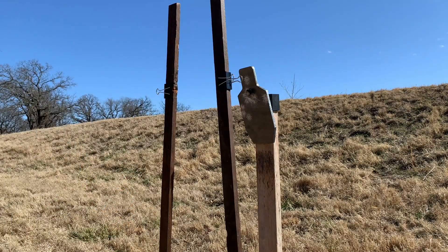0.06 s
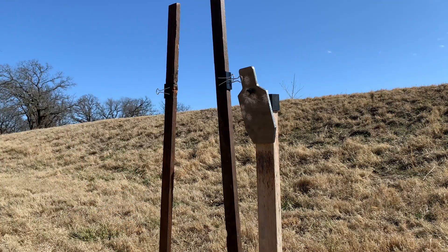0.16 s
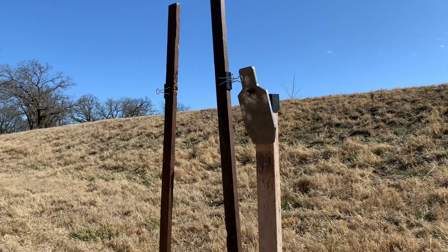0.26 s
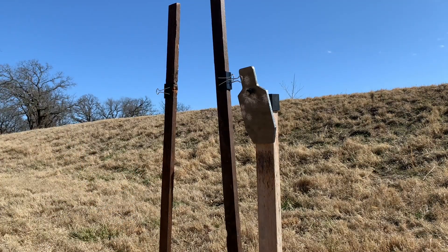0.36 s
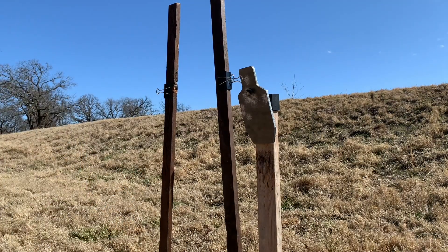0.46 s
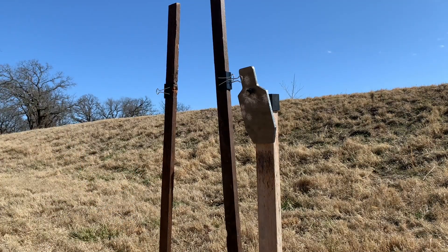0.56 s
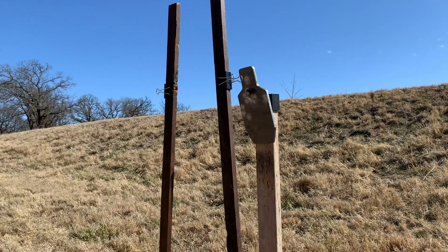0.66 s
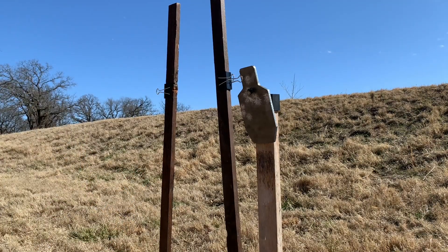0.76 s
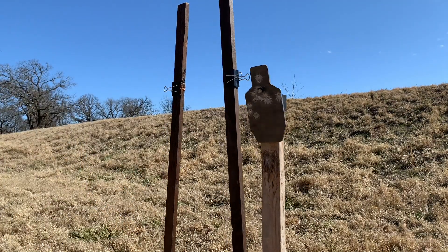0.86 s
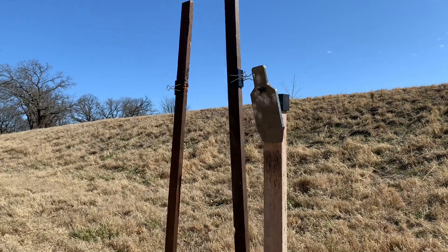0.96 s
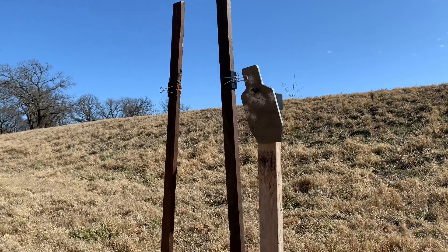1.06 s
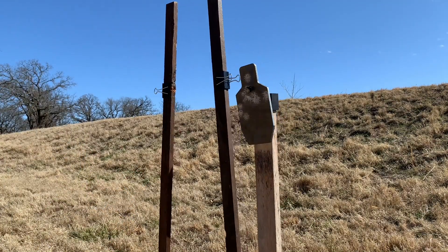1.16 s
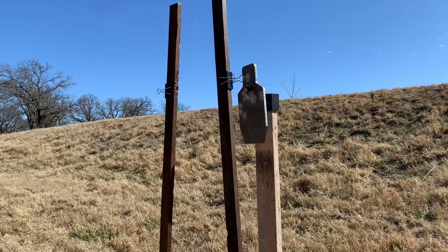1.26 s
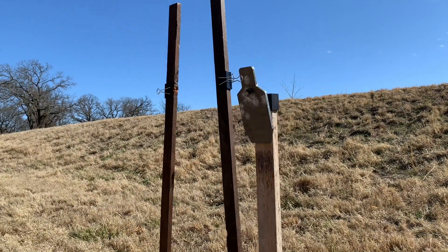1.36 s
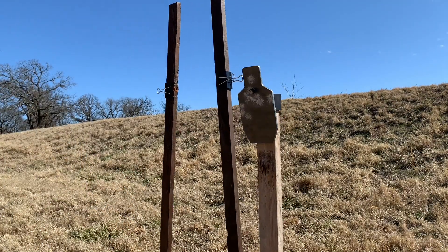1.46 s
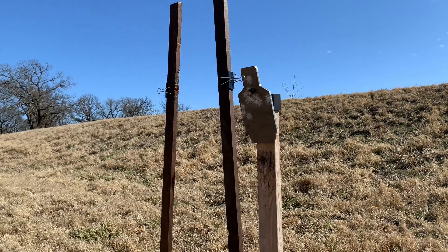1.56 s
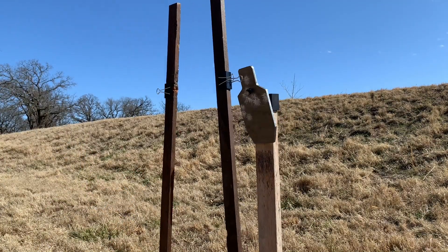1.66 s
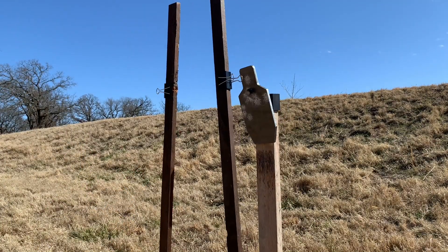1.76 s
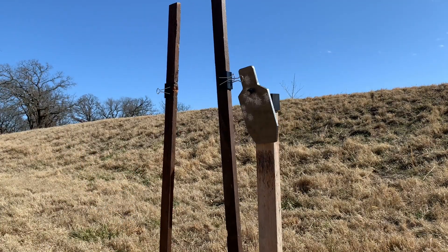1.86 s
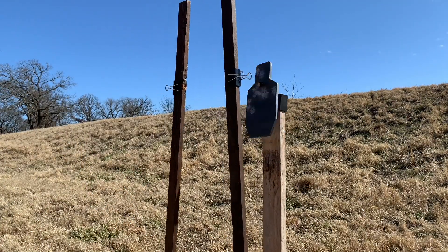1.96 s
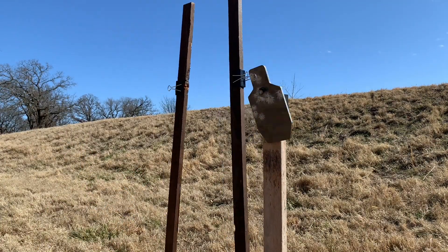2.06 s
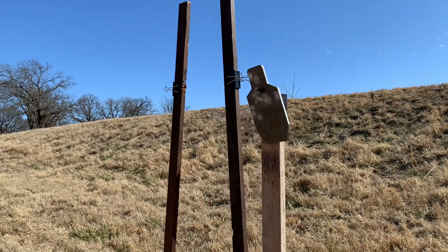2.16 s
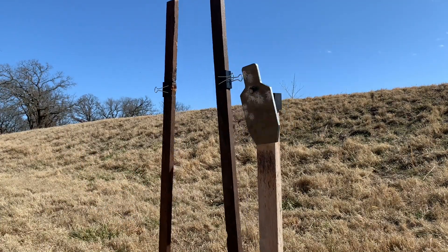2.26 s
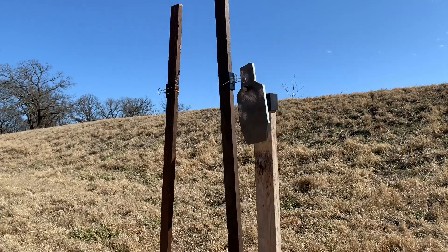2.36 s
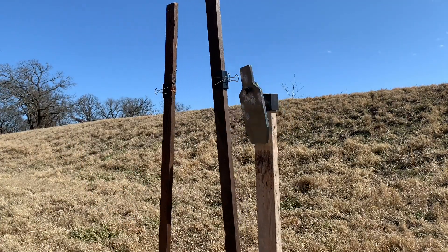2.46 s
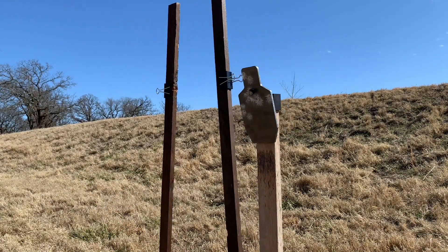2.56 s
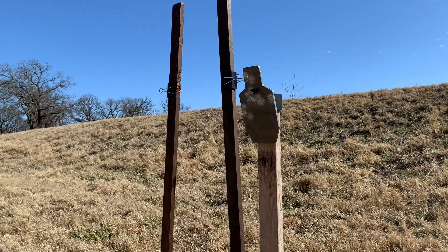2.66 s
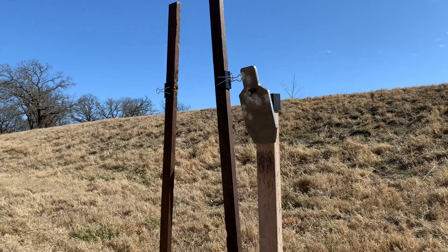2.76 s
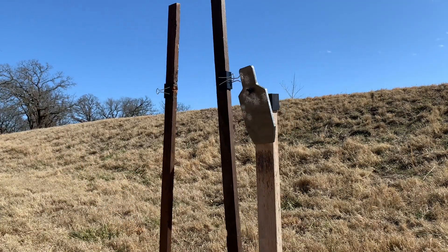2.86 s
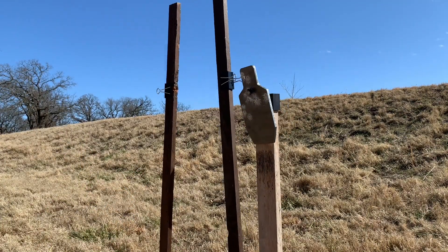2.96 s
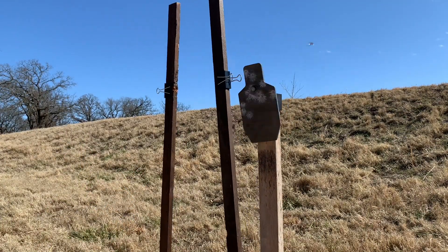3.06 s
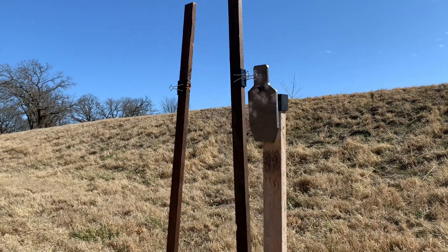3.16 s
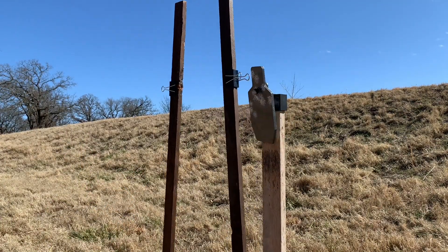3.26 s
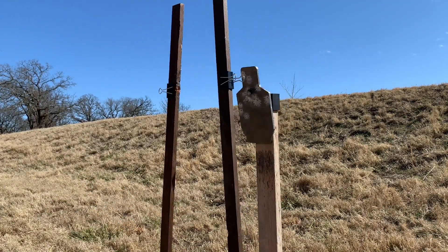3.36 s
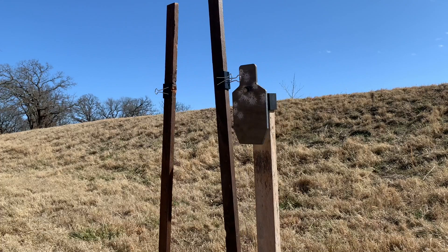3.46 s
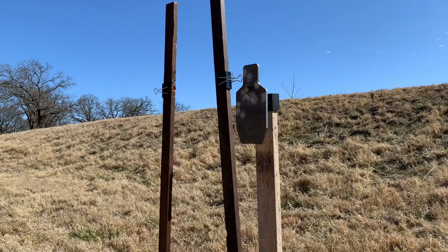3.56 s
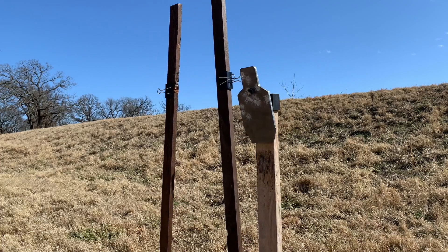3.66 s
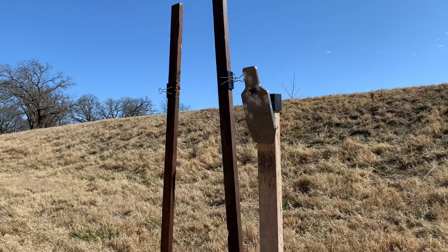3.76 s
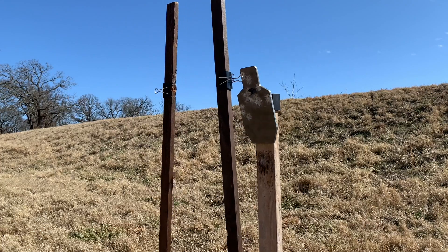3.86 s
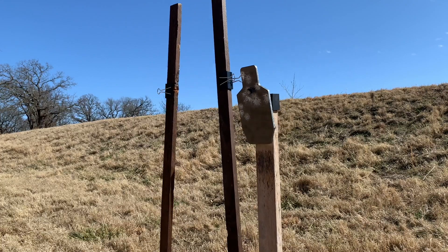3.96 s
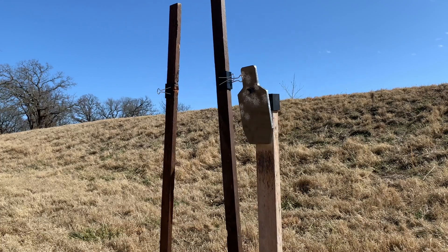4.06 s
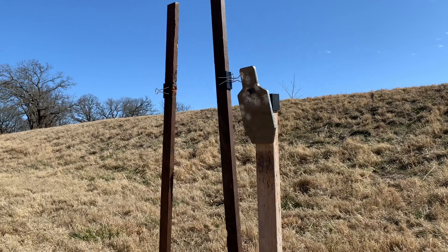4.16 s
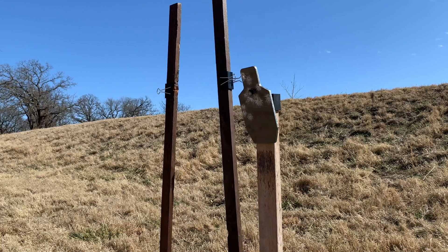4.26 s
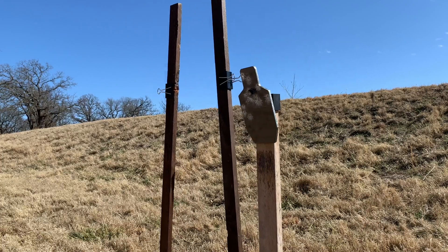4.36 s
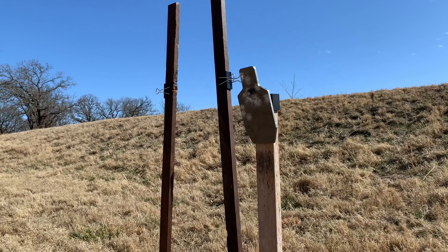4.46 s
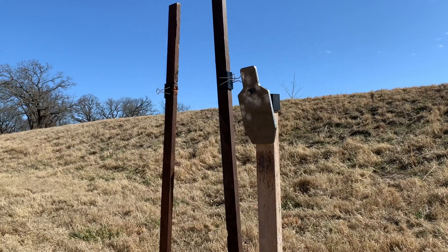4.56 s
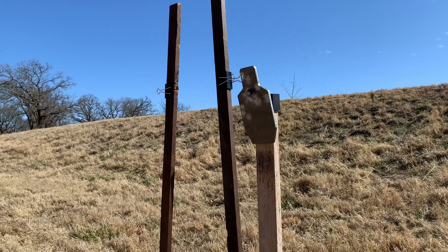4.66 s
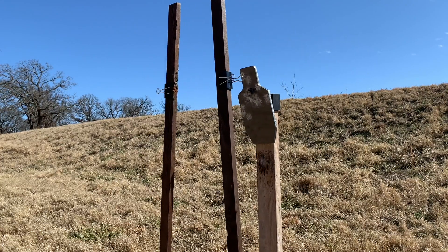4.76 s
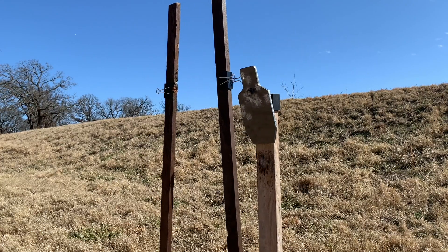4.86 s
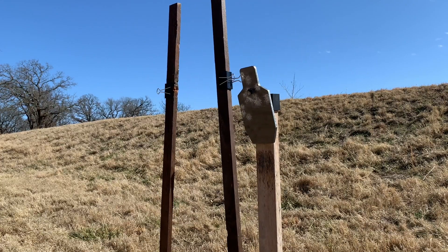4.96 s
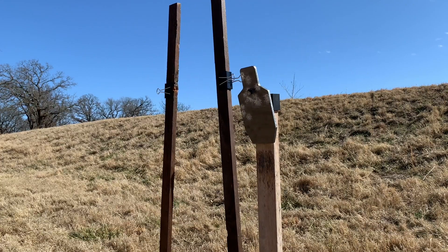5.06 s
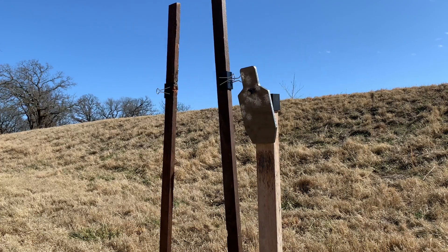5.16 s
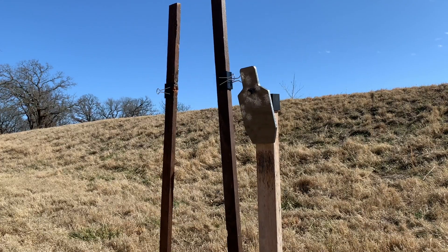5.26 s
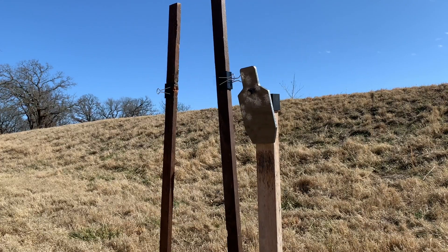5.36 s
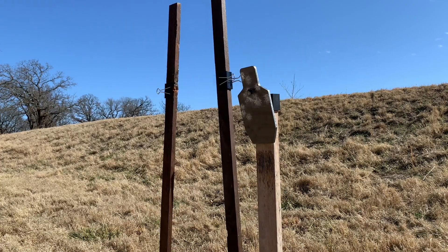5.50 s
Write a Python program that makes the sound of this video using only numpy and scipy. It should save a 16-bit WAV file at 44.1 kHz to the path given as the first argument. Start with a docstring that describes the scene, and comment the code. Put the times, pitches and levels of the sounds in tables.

```python
"""Wind buffets the microphone, then three pistol bullets strike a steel plate hung on a wooden post in an open field.
Each blast is a burst of coloured noise with a sharp crack, loud enough to overload the microphone; the post thumps.
The plate is a set of dying tones that swell and dip as it swings out and back, turning their lobes past the microphone.
Bands of noise make the roll, crackle and hiss after each shot, and the later slaps from far slopes.
The wind is low, lumpy noise over a faint rustle."""
import sys
import numpy as np
from scipy import signal
from scipy.io import wavfile
from scipy.ndimage import uniform_filter1d

SR = 44100
rng = np.random.default_rng(int(sys.argv[2]) if len(sys.argv) > 2 else 0)


def waveform_to_disk(signal):
    """Save audio, clipped to [-1, 1], as 16-bit WAV at the path in sys.argv[1]."""
    frames = np.transpose(np.atleast_2d(signal))
    scaled = np.clip(frames, -1, 1) * 32767
    samples = np.round(scaled).astype(np.int16)
    wavfile.write(sys.argv[1], SR, samples)


N = 243873  # length in samples, about 5.5 s

# The three shots. Each row: blast arrives in s, crack of the impact in s, ring breaks through in s.
SHOT_TIMES = [(.688, .7095, .716), (1.840, 1.8435, 1.851), (2.9955, 2.9958, 3.004)]
# Strength of each shot. Each row: rise time of the faint noise before the blast in s, blast level in dB,
# crack level in dB, thump level of the post in dB, pitch factor of the post.
SHOT_FORCE = [(0.0034, 6.5, 0.5, 0, 1.02), (0.0054, 4, -7.5, -7, 1.02), (0.0035, 7, -0.5, -1, .96)]
# Tone colour of the blast. Each row: frequency in Hz, relative level in dB per Hz.
BLAST_COLOUR = [(50, -24.5), (105, -7.5), (190, -13), (300, 0), (480, -9), (640, -2), (1000, -16),
                (2300, -22.5), (6000, -29), (12000, -72)]
# How alike left and right are in the blast. Each row: frequency in Hz, likeness from -1 to 1.
BLAST_LIKENESS = [(60, 0.68), (240, -0.39), (950, -0.71), (3770, -0.85), (15000, -0.99)]
# Tones of the wooden post: frequencies in Hz, before the pitch factor of the shot.
POST_TONES_HZ = (74, 108, 300, 372)
# For the same tones. Each row: level in dB on top of the thump level, time to fall by 60 dB in s.
POST_DECAY = [(-2.5, 0.19), (-2, 0.08), (-7, 0.11), (-9, 0.11)]


def blasts():
    """A churning pressure burst that lasts until the ring, with a sharp crack and the thump of the post."""
    churn = noise(BLAST_COLOUR, BLAST_LIKENESS, 1.3)
    snap = rng.standard_normal(N)
    out = np.zeros((2, N))
    t = np.arange(N) / SR
    for (start, crack, ring), (rise, blast_db, crack_db, post_db, pitch) in zip(SHOT_TIMES, SHOT_FORCE):
        # a faint noise rises just before the blast, which jumps to full level
        lead_in = np.exp(np.minimum(t - start, 0) / rise) * np.where(t < start, .3, 1)
        # steep drop just before the ring
        drop_db = 3100 * np.maximum(t - ring + 0.0027, 0)
        out += amp(blast_db - drop_db) * lead_in * churn
        out += fading(crack, crack_db, 12000) * snap
        thump = ring - .002
        for hz, (db, t60) in zip(POST_TONES_HZ, POST_DECAY):
            tone = np.sin(2 * np.pi * hz * pitch * (t - thump))
            out -= fading(thump, post_db + db, 60 / t60) * tone
    return out


# How the plate turns after each hit. Each row: turn when hit, bend of the kick (1 = even, 2 = slow to start),
# turn at the far point, starts back in s after the hit, at rest in s after the hit, turn at rest.
PLATE_SWING = [(0.17, 2.2, 1.076, 0.36, 0.476, .55), (0.065, 1.1, 0.904, 0.48, .62, 0.6),
               (-0.021, 0.99, 1.12, 0.23, 0.582, -0.25)]
KICK_S, KICKED_TURN = .16, .81  # the kick lasts this long and reaches this turn (about 0-1)
CREEPS_S, FAR_S = .24, 0.31  # after a hit: starts to creep on, reaches the far point


def swing(t, hit, bend, far, back_s, rest_s, rest):
    """Turn of the plate t seconds after a hit: kicked round, creeping to its far point, falling back ever faster."""
    kick = np.clip(t / KICK_S, 0, 1) ** bend
    creep = np.clip((t - CREEPS_S) / (FAR_S - CREEPS_S), 0, 1)
    fall = np.clip((t - back_s) / (rest_s - back_s), 0, 1) ** 2.33
    return hit + (KICKED_TURN - hit) * kick + (far - KICKED_TURN) * creep + (rest - far) * fall


# Ringing modes of the plate. Each row: frequency in Hz, time to fall by 60 dB in s,
# added loss in dB/s once the plate leans on its post, fill between the lobes (0-1),
# then for shots 1-3 each: lobe sweep in rad per unit of turn (3 columns),
# lobe angle facing the microphone in rad (3 columns), lead of the left side in rad (3 columns).
PLATE_MODES = [(625, 0.4, 0, 0.03, 4.9, 0.8, 0.6, 0.54, 1.4, 1.3, -0.0, -0.4, 0.9),
               (1050, 2.4, 54, 0.03, 0.4, 0.1, 0.5, 1.33, 1.49, 1.3, -0.4, -0.2, -0.1),
               (2070, 1.76, 5, 0.68, 2.3, 5.9, 5.6, 1.03, 0.41, 0.48, -0.4, -0.4, -0.2),
               (3104, 0.77, 0, 0.16, 1.9, 5.4, 1.1, 1.44, 0.45, 1.21, -2.2, -0.2, -1.1),
               (3987, 0.81, 51, 0.05, 2.3, 5.4, 3.3, -0.41, 0.64, -0.72, 0.6, 0.0, 0.5),
               (4815, 0.64, 400, 0.4, 3.9, 9.4, 4.8, 0.86, -0.01, 0.78, -0.9, 0.7, 1.0),
               (6415, 0.36, 182, 0.08, 4.8, 1.0, 5.7, 0.42, 1.27, 0.72, -0.6, -0.7, -0.7),
               (6960, 0.62, 301, 0.03, 5.1, 2.8, 1.3, 0.28, 1.57, 1.43, -0.7, -0.6, -1.4),
               (7158, 0.85, 179, 0.07, 5.1, 5.2, 5.4, 0.36, -0.27, 1.2, -1.1, -1.3, -1.2),
               (7980, 0.7, 400, 0.07, 5.3, 5.8, 7.5, 0.2, -0.36, 0.64, -2.4, -2.5, -2.3),
               (9105, 1.16, 159, 0.19, 3.7, 4.9, 5.4, 1.44, 0.42, 0.78, 2.4, 2.4, 2.4),
               (9720, 0.21, 400, 0.1, 3.4, 3.1, 6.9, 0.79, 0.63, -0.36, 1.9, 1.2, 1.7),
               (10255, 0.32, 400, 0.05, 4.0, 3.5, 4.7, 0.67, 0.43, 0.92, 0.9, 0.9, 0.7),
               (10668, 0.55, 64, 0.14, 5.7, 4.1, 1.5, 0.23, 0.43, 0.54, 0.4, 0.3, -0.0),
               (11158, 0.15, 400, 0.03, 8.1, 1.1, 0.1, -0.34, 1.26, 1.45, 0.0, 0.1, -0.0),
               (11462, 0.95, 32, 0.13, 6.0, 2.1, 1.6, 0.18, -1.05, -1.17, -0.4, -0.3, -0.5),
               (12245, 0.16, 390, 0.19, 5.8, 2.6, 7.8, 0.52, 0.76, -0.41, -1.4, -1.8, -1.8),
               (12310, 0.62, 55, 0.32, 2.7, 10.0, 3.8, -0.88, -0.11, -0.59, -2.2, -1.8, -1.2),
               (14286, 0.51, 0, 0.03, 5.5, 0.1, 4.8, 0.82, 1.52, -1.47, 2.0, 2.2, 2.0),
               (15140, 0.22, 400, 0.03, 5.4, 1.3, 1.1, 0.33, 0.96, 1.05, 0.1, -0.0, 0.2)]
# For the same modes. Each row: left minus right in dB, then level in dB in shots 1-3, before the lobes.
PLATE_LEVELS = [(2.5, -17, -5, -20.5), (-1.8, -19.5, -3.5, -17.5), (0.9, -28, -11.5, -15),
                (-1.45, -24, -6, -21.5), (-4, -26.5, -37, -37.5), (-6.5, -32, -15, -16.5),
                (-0.1, 1.5, 0, 4), (-0.5, -24.5, -30, -19.5), (0.3, -6.5, -10.5, -6.5),
                (-0.5, 1, -35, -18.0), (0.17, -16, -17.0, -16.5), (4.5, -4.5, -12, -12),
                (-2.26, -12, -9.5, -9.5), (0, -5.0, -24, -24.5), (-6, -6.5, -2, 1.5), (-2.5, -22, -40, -33),
                (-1, -7, -12.5, -2.5), (3.5, -39.5, -18, -35.5), (1.63, -14, -2, -13),
                (-4, -19, -34.5, -27)]
# Motion of the plate. Each row: time after a hit in s, speed toward the microphone in m/s.
PLATE_APPROACH = [(0, -.2), (.08, -.2), (.18, .15), (.28, .4), (.38, .35), (.5, 0)]
LANDS_S = .45  # after a hit, the plate leans on its post


def plate():
    """Dying modes, each swelling and dipping as its lobes turn past the microphone; the next bullet starts them anew."""
    out = np.zeros((2, N))
    starts = [round(row[2] * SR) for row in SHOT_TIMES] + [N]
    chatter = evened(uniform_filter1d(uniform_filter1d(rng.standard_normal(N), size=900), size=300))
    for shot in range(len(SHOT_TIMES)):
        span = slice(starts[shot], starts[shot + 1])
        t = np.arange(span.stop - span.start) / SR
        # Doppler shift: the distance covered, divided by the speed of sound
        heard = t + np.cumsum(np.interp(t, *np.transpose(PLATE_APPROACH))) / SR / 343
        turn = swing(t, *PLATE_SWING[shot])
        onset = 1 - np.exp(-t / .012)
        leaning = np.clip(t - LANDS_S, 0, None)  # seconds spent leaning on the post
        for (hz, t60, lean_db, fill, *angles), (pan_db, *level_db) in zip(PLATE_MODES, PLATE_LEVELS):
            sweep, facing, lead = angles[shot::len(SHOT_TIMES)]
            gain_db = level_db[shot] - 60 * t / t60 - lean_db * leaning
            alive = slice(np.count_nonzero(gain_db > -115))  # skip what is too faint to hear
            lobes = np.cos(sweep * turn[alive] + facing) + 1j * fill
            if 900 < hz < 1500:  # the hook chatters and roughens this mode
                lobes *= (0.62 + 0.64 * chatter[span][alive]) * amp(-15 * leaning[alive])
            tone = np.exp(2j * np.pi * (hz * heard[alive] + rng.random()))
            ring = onset[alive] * amp(gain_db[alive]) * lobes * tone
            # left and right differ in level and in phase
            ports = amp([[pan_db / 2], [-pan_db / 2]]) * np.exp(.5j * lead * np.array([[1], [-1]]))
            out[:, span][:, alive] += (ring * ports).real
    return out


# Noise after each shot. Each row: burst holds in s, then roll, crackle and hiss in dB in the burst (3 columns),
# roll, crackle and hiss in dB in the tail (3 columns), rise of the tail in s,
# fall of the tail in dB/s before the factor of each layer.
WAKE_LEVELS = [(0.073, -23.5, -18.5, -20.5, -41, -37.5, -80, .2, 39),
               (.015, -23, -18, -10.5, -39.5, -31.5, -37.5, .04, 71),
               (0.038, -19, -16.5, -13, -43, -40, -67.5, .1, 50)]
# How fast the burst falls: roll, crackle and hiss in dB/s.
BURST_FALL = (331.5, 520.5, 421)
# Factor on the fall of the tail: roll, crackle and hiss.
TAIL_FALL_FACTOR = (0.62, 1.1, 4.6)
# Tone colours of roll, crackle and hiss. Each row: frequency in Hz, relative level in dB per Hz.
ROLL_COLOUR = [(70, -26), (130, 4.5), (300, -11), (700, -2.5), (1300, -6.5), (2000, -30.5)]
CRACKLE_COLOUR = [(700, -25.5), (1300, 0.5), (2600, 1.5), (4200, -4), (6000, -18.5), (8000, -39)]
SPRAY_COLOUR = [(3500, -30), (5300, -9), (6600, -4), (8500, -13), (10400, -2), (12500, -4), (13300, -14),
                (14600, -3), (16000, -5), (16500, -15)]
# How alike left and right are, also in the slaps. Each row: frequency in Hz, likeness from -1 to 1.
WAKE_LIKENESS = [(60, .8), (290, .5), (900, .1), (3100, .15), (15000, .1)]


def wake():
    """After each shot: a low roll back from the field, the crackle of debris and the treble hiss of lead fragments."""
    level = np.zeros((3, N))
    for (_, _, ring), (hold, *db, tail_rise, tail_db_per_s) in zip(SHOT_TIMES, WAKE_LEVELS):
        t = np.arange(N) / SR - ring
        for k in range(3):
            burst_db = db[k] - BURST_FALL[k] * np.maximum(t - hold, 0)
            level[k] += (t > 0) * amp(burst_db)
            level[k] += fading(ring, db[k + 3], tail_db_per_s * TAIL_FALL_FACTOR[k], tail_rise)
    roll = noise(ROLL_COLOUR, WAKE_LIKENESS, 2.5)
    crackle = noise(CRACKLE_COLOUR, WAKE_LIKENESS, 4.5, size=256)
    hiss = noise(SPRAY_COLOUR, WAKE_LIKENESS, 3.5)
    return level[0] * roll + level[1] * crackle + level[2] * hiss


# Slaps from far slopes and knocks of the plate on its hook.
# Each row: start in s, thud level in dB, middle of the thud in Hz, hiss level in dB.
SLAP_EVENTS = [(1.317, -36, 795, -45.5), (1.356, -42.5, 646, -56), (2.023, -24.5, 670, -52),
               (2.084, -31, 1080, -40), (2.46, -46.5, 1040, -54), (2.533, -43.5, 930, -57.5),
               (3.159, -32, 990, -55), (3.303, -37.5, 2940, -60.5), (3.36, -40, 3580, -61.5),
               (3.616, -36, 634, -48), (3.806, -54.5, 386, -61.5), (4.106, -60.5, 334, -92),
               (4.197, -56, 528, -62.5), (4.27, -75, 600, -71)]
# Tone colour of their hiss. Each row: frequency in Hz, relative level in dB per Hz.
SLAP_HISS_COLOUR = [(1400, -30), (2400, -12), (6900, -3), (8600, -16), (10000, -3), (11800, -2),
                    (13300, -20), (14600, -2), (16000, -3), (16500, -12)]
SLAP_HISS_T60_S = 0.23  # time for the hiss to fall by 60 dB


def slaps():
    """A short thud of band-limited noise for each slap or knock, then a longer wash of hiss."""
    hiss = noise(SLAP_HISS_COLOUR, WAKE_LIKENESS, 3.6)
    grit = rng.standard_normal(N)
    out = np.zeros((2, N))
    for s, thud_db, hz, hiss_db in SLAP_EVENTS:
        band = signal.butter(2, [hz / 1.93, hz * 1.8], "bandpass", fs=SR)
        thud = evened(signal.lfilter(*band, grit))
        out += fading(s, thud_db, 940, 0.0015) * thud
        out += fading(s + .008, hiss_db, 60 / SLAP_HISS_T60_S, 0.0025) * hiss
    return out


# The wind over time. Each row: time in s, low buffeting in dB before lumps and swells,
# level of the faint rustle in dB.
WIND_LEVELS = [(0, -38, -51), (.68, -33, -53), (.86, -49, -69), (1.8, -54, -77.5), (2.1, -57.5, -81),
               (2.9, -62, -68.5), (3.2, -56.5, -78), (3.7, -69.5, -87), (4.3, -65, -85), (5.0, -68, -81),
               (5.53, -73.5, -85)]
# Short low swells. Each row: time of the peak in s, level in dB, half width in s.
LOW_SWELLS = [(0.044, -28, 0.01), (.465, -28.5, 0.0067), (1.08, -51, 0.093), (1.497, -41, 0.017),
              (1.642, -48.5, 0.059), (2.959, -50.5, .03), (3.33, -54, 0.071), (4.271, -49.5, 0.0083),
              (4.83, -58, 0.031), (5.361, -56.5, 0.013)]
# Tone colours of the low noise and the rustle. Each row: frequency in Hz, relative level in dB per Hz.
LOW_COLOUR = [(12, -35), (22, -10), (50, 3.5), (130, -5), (220, -16), (400, -19.5), (600, -65.5)]
RUSTLE_COLOUR = [(150, -12.5), (320, -4.5), (370, 2), (420, -6.5), (600, -10.5), (1800, -21), (4000, -35),
                 (16000, -42)]
# How alike left and right are in the wind. Each row: frequency in Hz, likeness (held within -1 to 1 when used).
WIND_LIKENESS = [(60, 0.9), (240, 0.062), (950, -0.74), (3770, -0.25), (15000, -1.4)]
LUMPS_DB = 3.5  # typical size of the slow, random level changes


def wind():
    """Lumpy low buffeting and short low swells, over a faint rustle that sinks after the first shot and varies."""
    t = np.arange(N) / SR
    s, buffet_db, rustle_db = np.transpose(WIND_LEVELS)
    lumps = evened(uniform_filter1d(uniform_filter1d(rng.standard_normal(N), size=2000), size=1500))
    level = amp(np.interp(t, s, buffet_db) + LUMPS_DB * lumps)
    level += sum(amp(db) * np.exp(-((t - at) / width) ** 2) for at, db, width in LOW_SWELLS)
    low = level * noise(LOW_COLOUR, WIND_LIKENESS, 2.0, size=2048)
    rustle = amp(np.interp(t, s, rustle_db)) * noise(RUSTLE_COLOUR, WIND_LIKENESS, 1.7, size=2048)
    return low + rustle


def amp(db):
    """Decibels to gain."""
    return 10 ** (np.asarray(db) / 20)


def evened(x):
    """Scales to rms 1."""
    return x / np.sqrt(np.mean(x ** 2) + 1e-20)


def read(points, hz):
    """Straight lines between points on a log-frequency axis."""
    f, value = np.transpose(points)
    return np.interp(np.log(hz + 1), np.log(f + 1), value)[:, None]


def noise(spectrum, likeness, patchy_db, size=512):
    """Two channels of coloured noise with drifting louder and softer patches, built from short spectra."""
    hz = np.fft.rfftfreq(size, 1 / SR)
    a, b, c, d, patches = rng.standard_normal((4 * N // size + 5, len(hz), 5)).T
    patches = evened(uniform_filter1d(uniform_filter1d(patches, size=7, axis=0), size=9, axis=1))
    same = np.clip(read(likeness, hz), -1, 1)
    left = a + 1j * b
    right = same * left + np.sqrt(1 - same ** 2) * (c + 1j * d)  # part shared, part its own
    z = np.array([left, right])
    z *= amp(read(spectrum, hz) + patchy_db * patches)
    return evened(signal.istft(z, nperseg=size, noverlap=3 * size // 4)[1][:, :N])


def fading(s, db, db_per_s, rise=1e-4):
    """An envelope that starts at s, rises with time constant rise (s) and dies away evenly in dB."""
    out, first = np.zeros(N), round(s * SR)
    t = np.arange(min(N - first, int(100 / db_per_s * SR))) / SR  # ends after a fall of 100 dB
    out[first:first + len(t)] = amp(db - db_per_s * t) * (1 - np.exp(-t / rise))
    return out


def scene():
    """All sources at the microphone."""
    return blasts() + plate() + wake() + slaps() + wind()


EDGE_HZ = 16300  # top of the band that is kept


def record(dry):
    """The converter clips the blasts flat; then a low-pass filter limits the band."""
    flat = np.clip(dry, -.98, .98)
    lowpass = signal.firwin(255, EDGE_HZ, window=("kaiser", 7), fs=SR)
    return signal.oaconvolve(flat, lowpass[None], "same")


dry = scene()
out = record(dry)
waveform_to_disk(out)
```